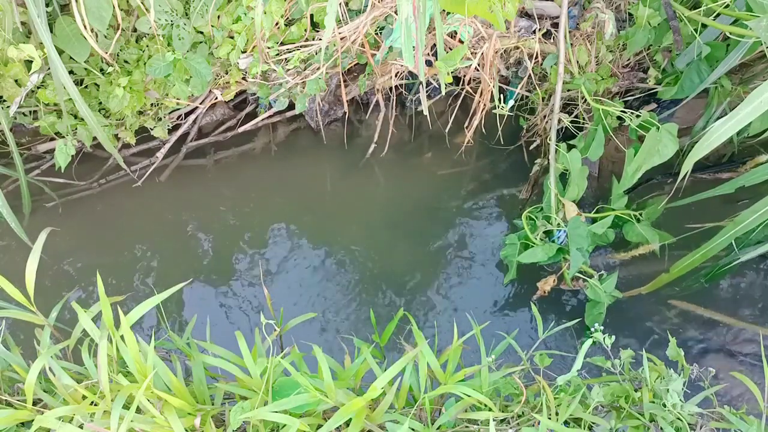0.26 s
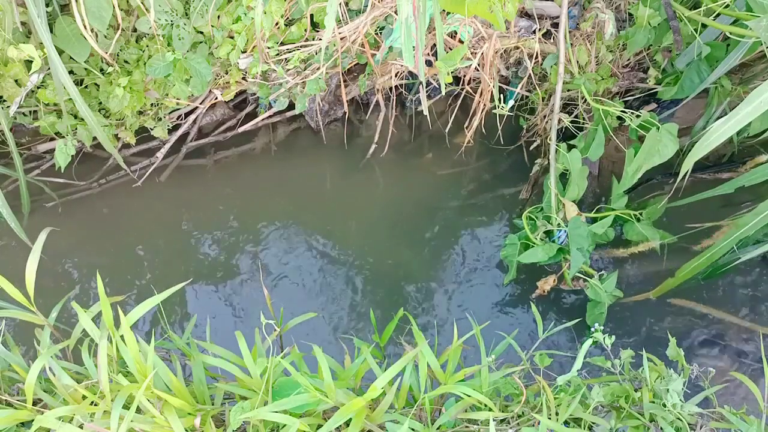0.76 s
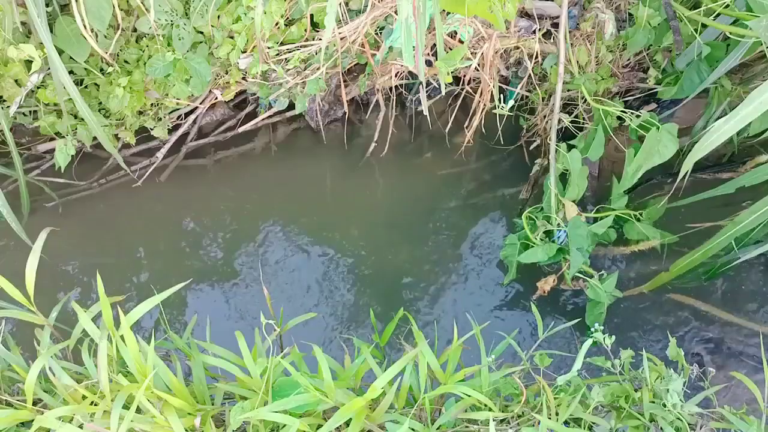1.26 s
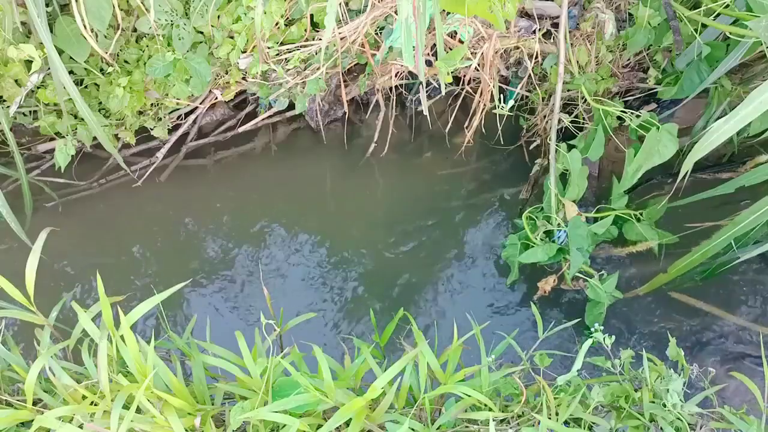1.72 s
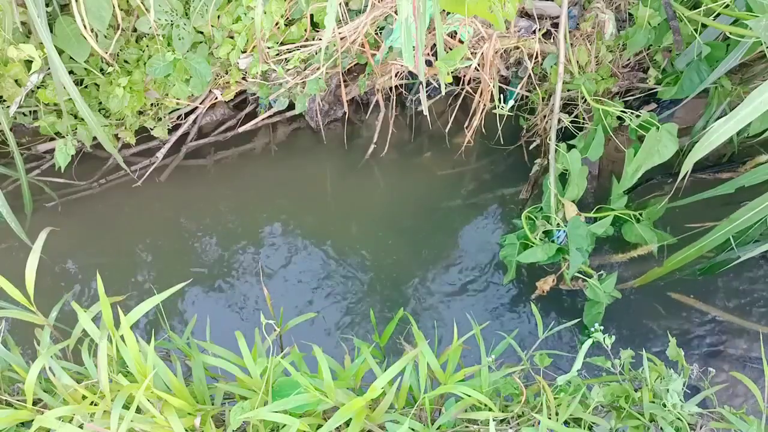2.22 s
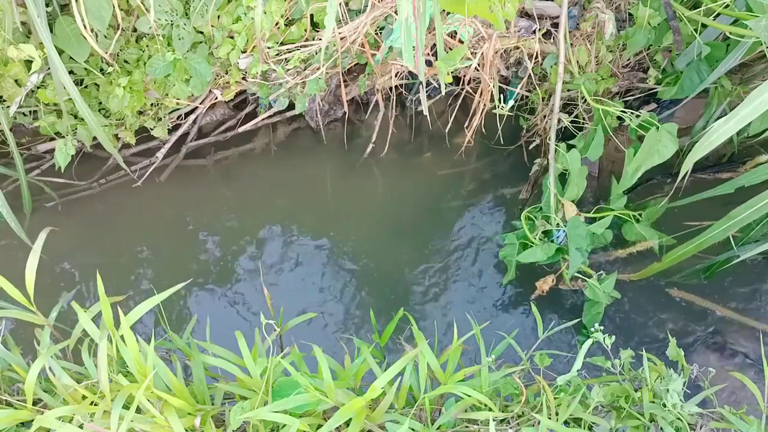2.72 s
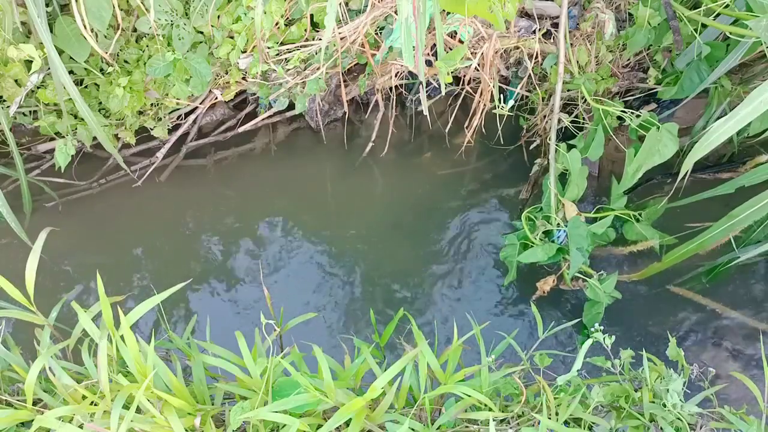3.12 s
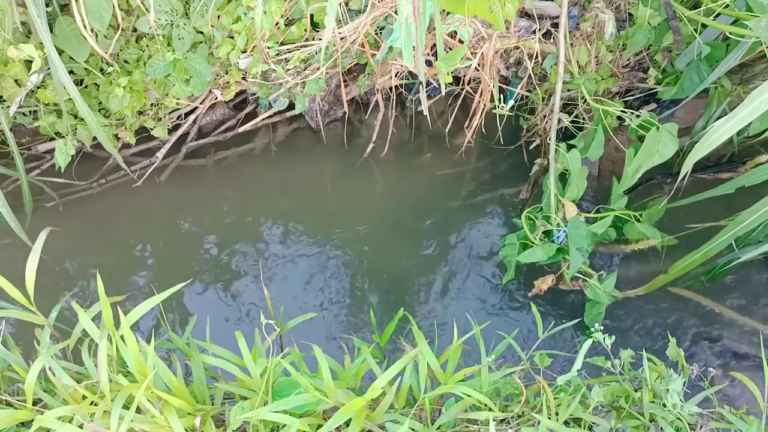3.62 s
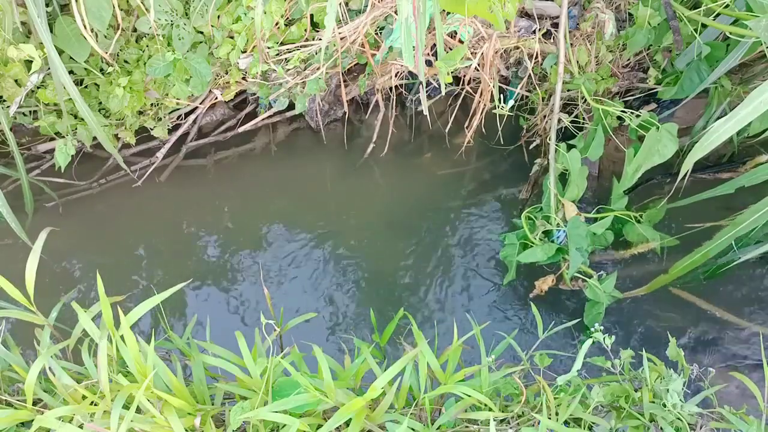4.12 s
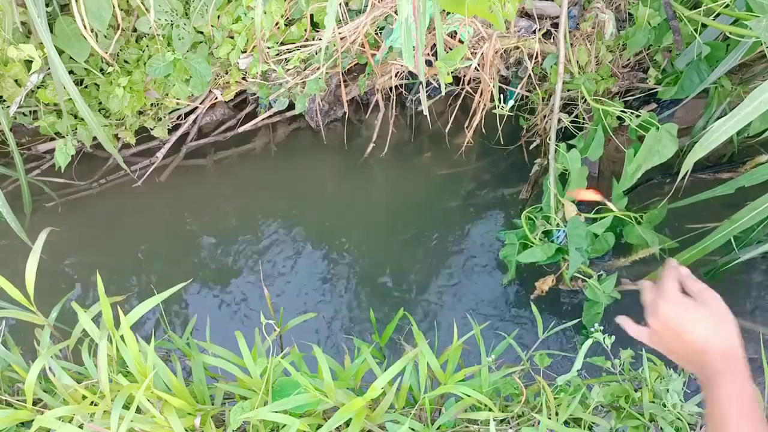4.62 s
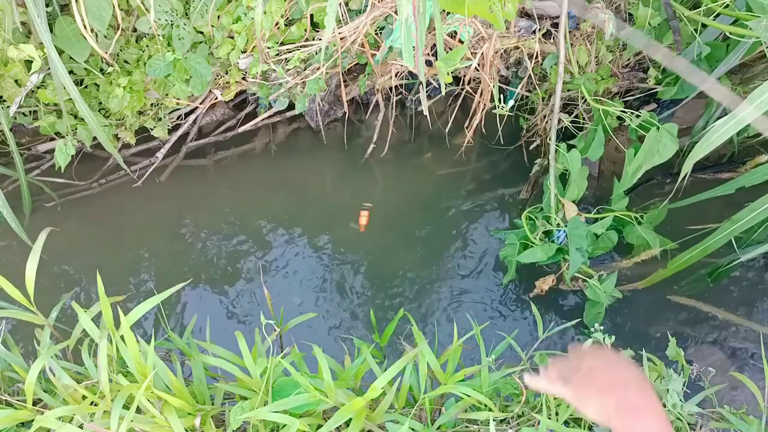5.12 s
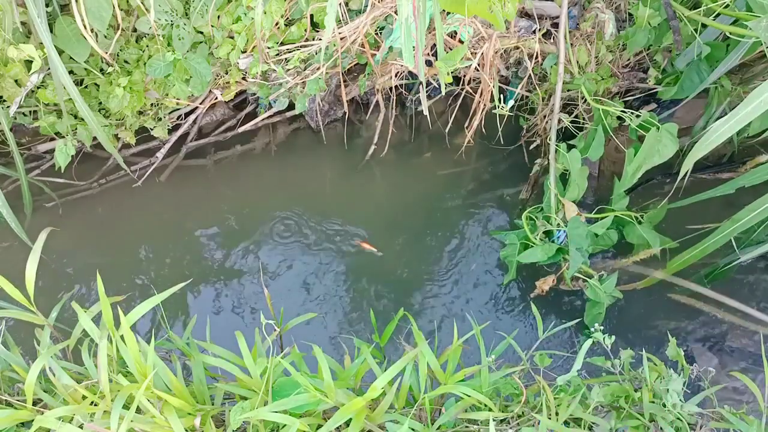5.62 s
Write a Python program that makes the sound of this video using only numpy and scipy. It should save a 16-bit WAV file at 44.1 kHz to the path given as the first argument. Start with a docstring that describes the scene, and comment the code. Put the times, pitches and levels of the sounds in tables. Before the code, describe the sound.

Outdoors, close to a narrow ditch lined with plants, a gentle current trickles and bubbles without pause. Sharp little plinks and crisp splashes dot the even hiss, with deeper glugs underneath. Faint high insect trills come and go, and a distant motor hums very quietly. The water sounds brighter on the right, with only a very short echo from the banks.

```python
"""A soft rush of water with low gurgles and sharp drips, running through a small overgrown ditch.
Trapped air rings as bubbles: big ones glug, tiny ones fizz, countless far ones blur into the rush.
Small splashes click, dry leaves tick and the banks throw back a short echo. Behind it all, insects
trill faintly in the grass and a far motor hums. Two microphone ports colour the sound differently;
the right one rings near 6.9 kHz."""
import sys
import numpy as np
from scipy import signal
from scipy.fft import rfft, irfft
from scipy.io import wavfile
from scipy.ndimage import uniform_filter1d

SR = 44100
rng = np.random.default_rng(int(sys.argv[2]) if len(sys.argv) > 2 else 0)


def generate_wav(sig):
    """Save sig (samples, or channels by samples) to the path in sys.argv[1] as 16-bit PCM at SR."""
    pcm = np.round(np.clip(np.atleast_2d(sig).T, -1, 1) * 32767).astype(np.int16)
    wavfile.write(sys.argv[1], SR, pcm)


N = 258426
PORT_LAG_S = -0.00028  # the water spills over on the right, so the right port hears it first
SURGE_TIMES = np.arange(0, N / SR + .01, .01)  # seconds

# The big glugs. Each row: start in seconds, relative level in dB, pitch in Hz, cycles to the peak.
GLUGS = [(0.046, -39, 1290, 2), (0.156, -43, 1820, 3), (0.465, -28.5, 1420, 2.3), (0.610, -38.5, 435, 1.6),
         (0.809, -35, 1300, 1.8), (0.872, -39.5, 250, 0.71), (0.973, -29.5, 232, 0.58),
         (0.987, -44, 302, 0.58), (0.988, -40, 573, 1.1), (0.997, -35, 273, 0.55), (1.231, -37.5, 865, 1.5),
         (1.256, -29, 1490, 2.4), (1.273, -39, 1610, 2.8), (1.304, -43, 1230, 2.5), (1.309, -41, 640, 1.7),
         (1.7, -42, 1045, 3.4), (1.732, -38.5, 423, 1.3), (1.741, -43, 1010, 2.2), (1.772, -42, 460, 1.3),
         (1.844, -40, 490, 1.9), (2.094, -44, 480, 1.6), (2.292, -43, 830, 2.6), (2.319, -43, 530, 1.8),
         (2.33, -42, 410, 1.6), (2.339, -42, 980, 2.2), (2.375, -38.5, 387, 1.5), (2.441, -42, 450, 2.2),
         (2.484, -37, 506, 1.8), (2.625, -44, 940, 2.2), (2.744, -43, 1320, 2.6), (2.798, -38.5, 746, 1.7),
         (2.820, -42.5, 510, 1.4), (2.950, -43, 1700, 2.9), (2.955, -41, 390, 1.4), (3.167, -47, 950, 2.2),
         (3.197, -43, 1810, 3), (3.273, -47, 1090, 2.3), (3.573, -40.5, 1600, 3.5),
         (3.705, -41.5, 403, 1.9), (3.707, -42, 1040, 1.8), (3.742, -38, 284, 0.71), (4.004, -39, 520, 2.2),
         (4.040, -43, 820, 2), (4.048, -41, 394, 1.5), (4.087, -41, 690, 2.1), (4.124, -42.5, 640, 2.6),
         (4.244, -40, 1150, 2.4), (4.436, -46, 926, 2.1), (4.675, -41, 670, 1.9), (4.698, -39.5, 630, 1.7),
         (4.801, -41, 465, 1.5), (4.826, -43, 850, 2), (5.052, -57, 1520, 2.2), (5.089, -40, 414, 1.1),
         (5.202, -40, 393, 1.4), (5.266, -39, 780, 1.7), (5.408, -37, 1950, 3), (5.489, -45, 680, 2.2),
         (5.563, -41, 1820, 3), (5.719, -41, 226, 1.1)]


def gurgling(churn, glug_db=-4):
    """Air folded under by the current rings as bubbles: round glugs, deep gurgles, a light trickle."""
    s, db, hz, cycles = np.transpose(GLUGS)
    glugs = bubbles(s, db + glug_db, hz, cycles, rise=0.0053)
    deep = swarm(churn, follow=0.15, band_hz=(165, 470), spread_db=-1.0,
                 cycles=1.15, rise=0.017, scatter_s=0.00011, count=1000)
    middle = swarm(churn, follow=0.24, band_hz=(303.2, 723), spread_db=1.0,
                   cycles=1.4, rise=0.025, scatter_s=0.000073, count=1300)
    trickle = swarm(churn, follow=0.43, band_hz=(839, 1812), spread_db=1.5,
                    cycles=9.9, rise=0.0078, scatter_s=0.00008, count=320)
    return glugs + gain_of(-56.5) * deep + gain_of(-57) * middle + gain_of(-63.5) * trickle


# Close, bright plinks. Each row: start in seconds, relative level in dB, pitch in Hz, cycles to the peak.
PLINKS = [(0.047, -39, 3200, 1.4), (0.1520, -36.5, 3020, 1.3), (0.1836, -38.5, 2790, 1.1),
          (0.2390, -34, 3820, 1.5), (0.562, -35, 3200, 0.96), (0.83, -34, 2700, 2.1),
          (0.9078, -29.5, 3220, 1.6), (1.0247, -40, 3180, 2), (1.0768, -30, 2900, 0.89),
          (1.2010, -43, 2470, 1.6), (1.279, -42, 3190, 1.2), (1.2935, -35.5, 2960, 0.99),
          (1.3563, -33.5, 3270, 1.7), (1.4422, -41, 2430, 1.7), (1.72, -38, 2880, 3.1),
          (1.8298, -38.5, 2840, 1.4), (1.8452, -37.5, 2960, 1.9), (1.8736, -36, 3050, 2.1),
          (1.9178, -36.5, 3170, 2.4), (1.9570, -36, 3500, 1.0), (2.1500, -32, 3900, 1.9),
          (2.759, -34, 2840, 0.65), (2.832, -41, 2500, 1.5), (2.8965, -39, 2500, 1.2),
          (2.9919, -31.5, 3080, 0.84), (3.1241, -30.5, 2880, 1.55), (3.3216, -37.5, 3200, 1.4),
          (3.3650, -39, 3270, 1.6), (3.7518, -36, 3300, 1.4), (4.0045, -33, 3270, 0.96),
          (4.3520, -35, 3370, 1.6), (4.677, -39.5, 2970, 1.4), (4.698, -38.5, 3160, 1),
          (4.776, -35, 3790, 1.6), (5.1455, -37.5, 3230, 2.1), (5.2071, -51, 3580, 1.1),
          (5.791, -24.5, 3250, 0.74)]


def dripping(ring_db=-1, slap_db=-11):
    """Near drops slap the surface; each traps a bubble that rings for an instant."""
    s, db, hz, cycles = np.transpose(PLINKS)
    rings = bubbles(s, db + ring_db, hz, cycles, rise=0.0069)
    slaps = bubbles(s, db + slap_db, hz, cycles=0.075, rise=0)
    return rings + slaps


# Crisp little splashes. Each row: start in seconds, level in dB, pitch of the first click in Hz.
SPLASH_HITS = [(0.1836, -34, 4700), (1.2013, -32, 4200), (1.3667, -40, 5130), (1.511, -32.5, 4340),
               (1.7342, -31, 5230), (2.0013, -35, 4380), (2.2927, -34, 4700), (2.3910, -33.5, 5000),
               (2.511, -50, 4900), (2.6956, -33, 4780), (2.7345, -35, 4570), (2.764, -36, 4580),
               (2.872, -31, 5530), (3.323, -50, 4650), (3.3958, -34, 4500), (3.965, -35, 4570),
               (4.3928, -33, 4420), (4.6986, -32.5, 4940), (4.778, -33, 4260), (4.904, -33, 4850),
               (5.126, -40, 4100), (5.181, -35, 5100), (5.4952, -34, 4830), (5.7924, -33, 4850),
               (5.7975, -40, 4100)]


def splashing(gap_s=0.0014, fall_db=8, pitch_spread=0.68, count=4):
    """A small splash is one sharp click and a few lower droplets, each later and weaker than the last."""
    s, db, hz = np.transpose(SPLASH_HITS)[:, :, None]
    wait, pitch = rng.random((len(s), 2, count)).transpose(1, 0, 2)
    order = np.arange(count)
    is_droplet = order > 0
    s = s + gap_s * np.cumsum(is_droplet * (.5 + wait), axis=1)
    db = db - fall_db * np.sqrt(order)
    hz = hz * np.exp(-pitch_spread * pitch * is_droplet)
    return bubbles(s.ravel(), db.ravel(), hz.ravel(), cycles=1.0, rise=0.0016)


# Tiny bubbles popping. Each row: start in seconds, relative level in dB, pitch in Hz.
POPS = [(0.3518, -22, 6430), (0.844, -21, 6330), (1.226, -25, 6300), (1.7574, -31, 6300),
        (2.712, -20, 6350), (2.852, -30, 6670), (3.144, -26, 6900), (3.587, -22, 6500), (4.353, -25, 6500),
        (4.9885, -20, 5760), (5.144, -25, 6600), (5.798, -24, 6400)]


def fizzing(splash, spray, pop_db=-17.5):
    """Small bubbles burst over a patter of far droplets and a fine fizz."""
    s, db, hz = np.transpose(POPS)
    pops = bubbles(s + 0.001018, db + pop_db, hz, cycles=3.5, rise=0.0015)
    patter = swarm(splash, follow=0.28, band_hz=(2172, 3660), spread_db=4.5,
                   cycles=1.9, rise=0.0027, scatter_s=0.0001, count=1400)
    crackle = swarm(splash, follow=0.23, band_hz=(2994, 5040), spread_db=7.0,
                    cycles=1.52, rise=0.0029, scatter_s=0.00032, count=900)
    fizz = swarm(spray, follow=0.21, band_hz=(5720, 10750), spread_db=2.5,
                 cycles=2.33, rise=0.013, scatter_s=0.000276, count=4000)
    sparkle = swarm(spray, follow=0.96, band_hz=(9400, 16200), spread_db=13.0,
                    cycles=0.47, rise=0.0026, scatter_s=0.000356, count=1100)
    return (pops + gain_of(-64.5) * patter + gain_of(-60) * crackle
            + gain_of(-57) * fizz + gain_of(-66.5) * sparkle)


def bubbles(s, db, hz, cycles, rise, lag_s=PORT_LAG_S):
    """Each bubble swells for `cycles` cycles, then rings out; `rise` bends its pitch upward."""
    length = int(np.clip(7 * np.max(cycles / hz) * SR, 32, 3000))
    index = (np.minimum(s, s + lag_s) * SR).astype(int)[:, None] + np.arange(length)
    ports = []
    for start in (s, s + lag_s):
        turns = np.maximum(index / SR - start[:, None], 0) * hz[:, None]
        age = turns / np.reshape(cycles, (-1, 1))
        envelope = gain_of(db)[:, None] * age * np.exp(1 - age)
        ring = envelope * np.sin(2 * np.pi * turns * (1 + rise * age))
        ports.append(np.bincount(np.maximum(index, 0).ravel(), ring.ravel(), N)[:N])
    return np.array(ports)


def swarm(swell, follow, band_hz, spread_db, cycles, rise, scatter_s, count):
    """A cloud of bubbles at random moments and places, their levels riding the swell; rms 1."""
    when, size, pitch, sustain, place = rng.random((count, 5)).T
    s = when * N / SR
    db = spread_db * np.minimum(-np.log(1 - size), np.e) + follow * swell_at(swell, s)
    low_hz, high_hz = band_hz
    hz = low_hz * (high_hz / low_hz) ** pitch
    lag_s = PORT_LAG_S + scatter_s * (2 * place - 1)
    return unit_rms(bubbles(s, db, hz, cycles * (.5 + sustain), rise, lag_s))


# The tone of the water bed. Each row: frequency in Hz, noise density in dB.
RUSH_SPECTRUM = [(20, -118), (34, -95.5), (50, -67), (75, -72), (100, -89.5), (145, -79.5), (180, -76.5),
                 (400, -88), (750, -91), (1450, -90.5), (2000, -90.5), (3000, -91), (4000, -87),
                 (6500, -92.5), (15000, -89)]
# Its stereo image. Each row: frequency in Hz, likeness of the two ports from 0 (wide) to 1 (focused).
RUSH_LIKENESS = [(50, 1), (200, 0.96), (450, 0.3), (1000, 0.62), (1400, 0.94), (1750, 1), (2100, 0),
                 (3100, 0.56), (4500, 0.53), (9000, 0)]


def rush(churn, splash, spray, patchy_db=1.5, flicker_db=0.97):
    """Countless far bubbles merge into noise that swells and flickers in patches."""
    frames, hz = N // 256 + 5, np.fft.rfftfreq(1024, 1 / SR)
    t = np.arange(frames) * 256 / SR
    noise = rng.standard_normal((5, frames, 513))
    left, unrelated = noise[0] + 1j * noise[1], noise[2] + 1j * noise[3]
    patches = unit_rms(uniform_filter1d(uniform_filter1d(noise[4], size=4, axis=0), size=14, axis=1))
    flicker = unit_rms(uniform_filter1d(rng.standard_normal(frames), size=3))
    likeness = curve_at(RUSH_LIKENESS, hz)
    lag_s = PORT_LAG_S * np.clip(hz / 400, 0, 1) ** 2  # the deep rumble comes from all sides
    right = likeness * left * np.exp(-2j * np.pi * hz * lag_s) + np.sqrt(1 - likeness ** 2) * unrelated
    lows = np.clip((2200 - hz) / 600, 0, 1) * np.clip(hz / 1000, 0, 1)
    highs = np.clip((hz - 4800) / 1000, 0, 1)
    mids = (1 - highs) * np.clip((hz - 1200) / 800, 0, 1)
    swell_db = sum(np.outer(swell_at(swell, t), band)
                   for swell, band in ((churn, lows), (splash, mids), (spray, highs)))
    movement = gain_of(swell_db + patchy_db * patches + flicker_db * flicker[:, None])
    colour = gain_of(curve_at(RUSH_SPECTRUM, hz))
    spectra = np.array([left, right]) * colour * movement
    _, bed = signal.istft(spectra.swapaxes(1, 2), nperseg=1024, noverlap=768)
    return np.sqrt(np.mean(colour ** 2) * SR / 2) * unit_rms(bed[:, :N])


def surge(wander_db, slow_hz, fast_hz, events=(), lift_db=0, lift_s=.05, count=30):
    """The flow's swell, in dB about its mean: it wanders by chance and lifts around any given events."""
    rates = np.geomspace(slow_hz, fast_hz, count)[:, None]
    waves = np.sin(2 * np.pi * (rates * SURGE_TIMES + rng.random((count, 1))))
    swell = wander_db * unit_rms(waves.sum(0))
    for s, db, *_ in events:
        size = gain_of(db - np.max(events, axis=0)[1])  # relative to the loudest event
        swell = swell + lift_db * size * np.exp(-.5 * ((SURGE_TIMES - s) / lift_s) ** 2)
    return swell - swell.mean()


# Needle-fine accents in the foliage. Each row: start in seconds, relative level in dB.
LEAF_ACCENTS = [(4.2153, -31), (4.4707, -29)]


def leaves(leaf_db=-2, leaf_hz=14500):
    """Dry leaves and stalks tick, very short and high."""
    s, db = np.transpose(LEAF_ACCENTS)
    return bubbles(s + 0.00076, db + leaf_db, np.full(len(s), leaf_hz), cycles=2.9, rise=0)


# Insects that never pause. Each row: pitch in Hz, bandwidth in Hz, level in dB.
STEADY_TRILLS = [(6420, 166, -60.5), (6810, 100, -68), (7290, 310, -63.5)]
# Insects in bouts. Each row: start in seconds, seconds until the fade-out, pitch in Hz, level in dB.
TRILL_BOUTS = [(0, 0.48, 8260, -57), (0, 0.81, 7730, -60.5), (1.714, 1.65, 8100, -56.5),
               (2.55, 1.63, 7710, -59), (4.903, 0.61, 8000, -63)]


def insects(bout_width_hz=350, attack_s=0.14, release_s=0.13, likeness=0.53):
    """Distant trills blur into narrow bands, partly alike at both ports; bouts swell, hold and fade."""
    t = np.arange(N) / SR
    songs = [(hz, width, gain_of(db)) for hz, width, db in STEADY_TRILLS]
    for start, length, hz, db in TRILL_BOUTS:
        attack = np.clip((t - start) / attack_s, 0, 1) if start > attack_s else 1  # already singing
        release = np.clip(1 - (t - start - length) / release_s, 0, 1)
        songs.append((hz, bout_width_hz, gain_of(db) * attack * release))
    chorus = np.zeros((2, N))
    for hz, width, level in songs:
        direct, scattered = narrow_noise(hz, width), narrow_noise(hz, width)
        chorus += level * np.array([direct, likeness * direct + np.sqrt(1 - likeness ** 2) * scattered])
    return chorus


def motor(hum_hz=54, hum_db=-67):
    """A far motor's unsteady hum, dead centre."""
    return gain_of(hum_db) * narrow_noise(hum_hz, width_hz=0.66)


def banks(x, t60_s, echo_db):
    """The banks and leaves scatter a short echo, different at each port."""
    t = np.arange(SR // 8) / SR
    taps = rng.standard_normal((2, len(t))) * (rng.random((2, len(t))) < .1)  # sparse reflections
    taps *= (t > .0008) * gain_of(-60 * t / t60_s)  # pre-delay and decay
    taps /= np.linalg.norm(taps, axis=1, keepdims=True)
    return x + gain_of(echo_db) * signal.oaconvolve(x, taps, axes=1)[:, :N]


def narrow_noise(hz, width_hz):
    """A narrow band of noise, heard as a wavering tone; rms 1."""
    f = np.fft.rfftfreq(N, 1 / SR)
    return unit_rms(irfft(rfft(rng.standard_normal(N)) / (1 + ((f - hz) / (.5 * width_hz)) ** 2), N))


def gain_of(db):
    """Decibels to amplitude."""
    return 10 ** (np.asarray(db) / 20)


def unit_rms(x):
    """Scales to rms 1."""
    return x / np.sqrt(np.mean(x ** 2) + 1e-20)


def curve_at(points, hz):
    """Reads a curve on a log-frequency axis."""
    f, value = np.transpose(points)
    return np.interp(np.log(hz + 1), np.log(f + 1), value)


def swell_at(swell, s):
    """Reads a swell at the times s, in dB."""
    return np.interp(s, SURGE_TIMES, swell)


def scene():
    """The mix: bubbles and drips echo between the banks, over a bed of rush, insects and hum."""
    churn = surge(wander_db=3.0, slow_hz=3, fast_hz=24.17)
    splash = surge(wander_db=1.5, slow_hz=2, fast_hz=16, events=PLINKS, lift_db=1.0, lift_s=0.072)
    spray = surge(wander_db=-1.14, slow_hz=7.9, fast_hz=40.7, events=POPS, lift_db=1.5, lift_s=0.022)
    gurgles = banks(gurgling(churn), t60_s=0.042, echo_db=-11)
    far = banks(fizzing(splash, spray) + leaves(), t60_s=0.03, echo_db=-4)
    near = banks(dripping() + splashing(), t60_s=0.042, echo_db=-7)
    return gurgles + near + far + rush(churn, splash, spray) + insects() + motor()


# The EQ of each microphone port. Each row: frequency in Hz, gain in dB.
LEFT_EQ = [(200, -4), (750, 2), (1500, -1.5), (3000, 1.5), (4000, -6.5), (4700, -3.5), (5000, -2),
           (5400, -3), (6200, -6), (7300, 2.5), (10600, 3), (12900, -10.5), (13600, -12), (15400, -31.5)]
RIGHT_EQ = [(200, -3.5), (750, 3.5), (1500, 0), (3100, 8), (3800, 1), (5000, 6), (5400, 14.5), (5850, 15),
            (6300, 18), (6900, 22), (8000, 7), (8800, -7), (10000, -13.5), (12800, -3.5), (14400, 6)]


def record(dry, cutoff_hz=15600):
    """Each microphone port adds its own resonances; a steep low-pass then trims the top."""
    hz = np.fft.rfftfreq(4096, 1 / SR)
    log_gain = np.log(gain_of([curve_at(LEFT_EQ, hz), curve_at(RIGHT_EQ, hz)]))
    mirrored = np.concatenate([log_gain, log_gain[:, -2:0:-1]], axis=1)
    response = np.exp(np.conj(signal.hilbert(mirrored)))  # minimum phase: a port rings after a click
    impulses = np.fft.ifft(response).real[:, :2048]
    coloured = signal.oaconvolve(dry, impulses, axes=1)[:, :N]
    lowpass = signal.firwin(511, cutoff_hz, window=("kaiser", 9), fs=SR)
    return signal.oaconvolve(coloured, lowpass[None], "same", axes=1)


dry = scene()
out = record(dry)
generate_wav(out)
```